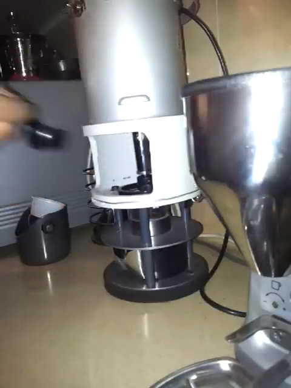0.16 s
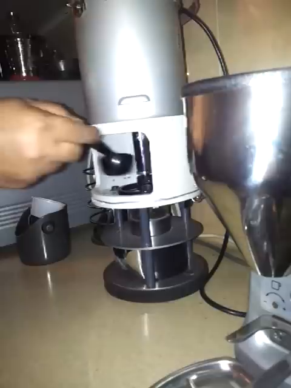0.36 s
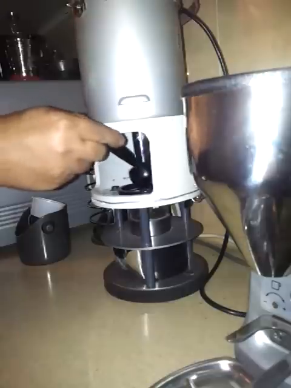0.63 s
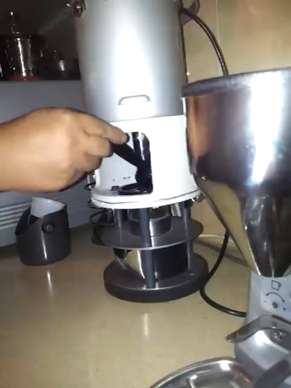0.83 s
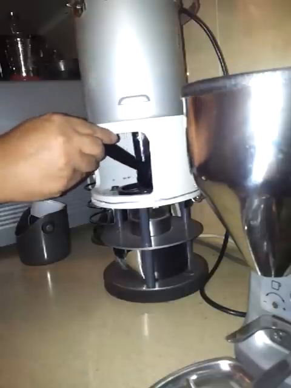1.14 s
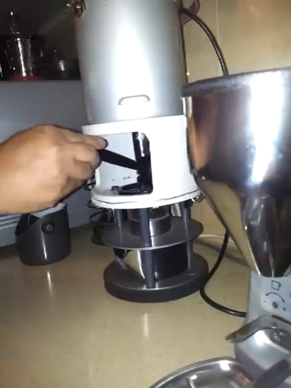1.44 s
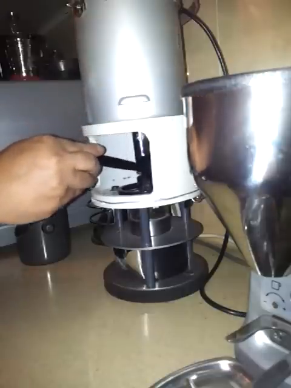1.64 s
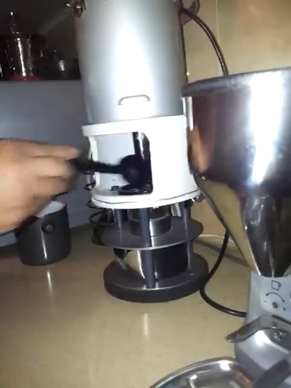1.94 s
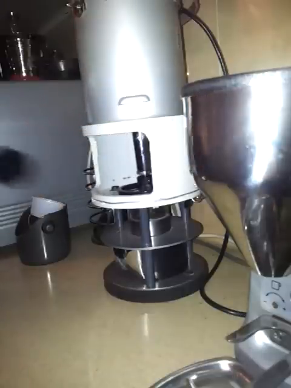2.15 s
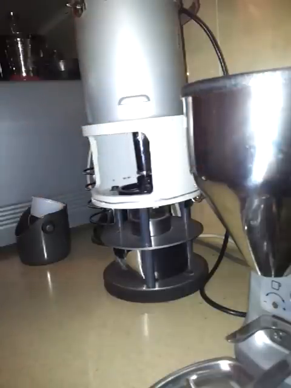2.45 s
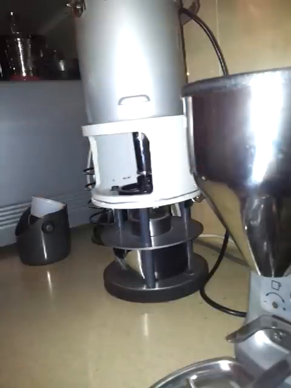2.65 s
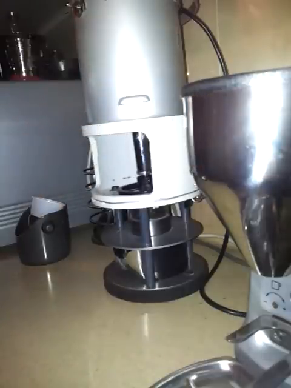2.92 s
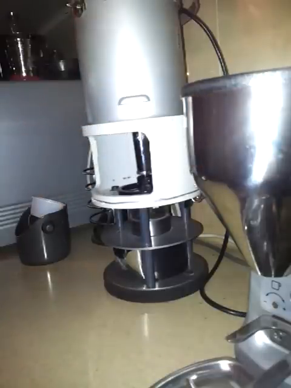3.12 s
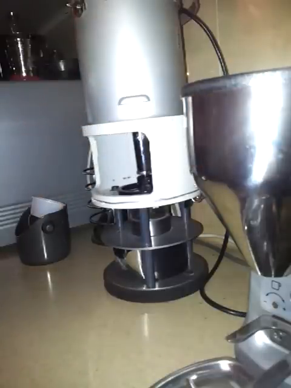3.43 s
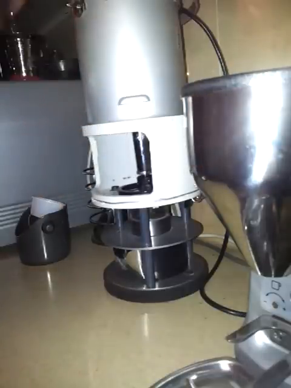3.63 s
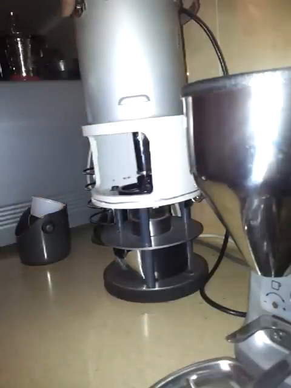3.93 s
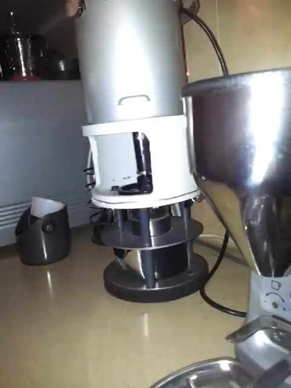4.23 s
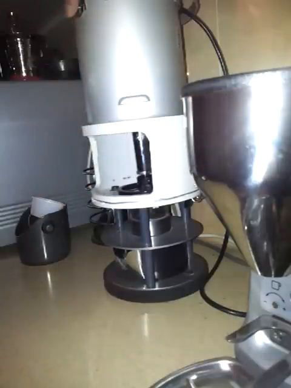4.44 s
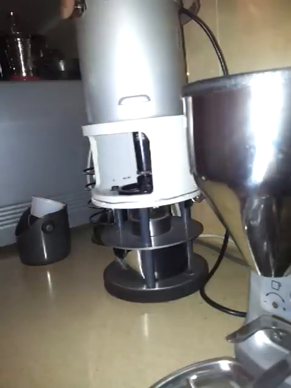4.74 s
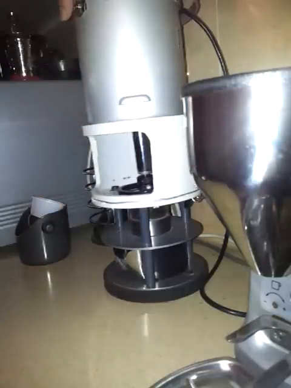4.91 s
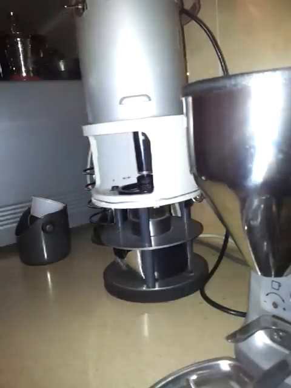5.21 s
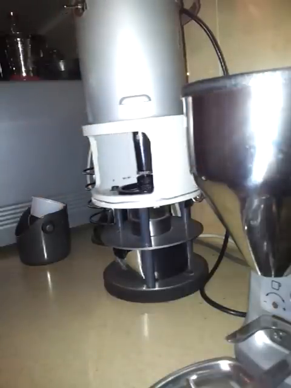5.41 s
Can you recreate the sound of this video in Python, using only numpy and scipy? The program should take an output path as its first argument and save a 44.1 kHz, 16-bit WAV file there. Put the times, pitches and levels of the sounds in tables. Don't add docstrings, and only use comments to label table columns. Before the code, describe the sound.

Beans tick down a metal chute, a cupboard knock and ringing steel lid follow, a switch snaps, then a coffee grinder starts crunching loudly.

```python
import sys
import numpy as np
from scipy import signal
from scipy.fft import rfft, irfft, next_fast_len
from scipy.io import wavfile
from scipy.ndimage import uniform_filter1d

SR = 44100
rng = np.random.default_rng(int(sys.argv[2]) if len(sys.argv) > 2 else 0)


def digitize_waveform(pressure):
    field = np.atleast_2d(pressure).T
    bounded = np.clip(field, -1, 1)
    quanta = np.round(bounded * 32767).astype(np.int16)
    wavfile.write(sys.argv[1], SR, quanta)


def linear_from_db(decibels):
    return 10 ** (np.asarray(decibels, float) / 20)


N = 245637
TIME = np.arange(N) / SR
SIZE = next_fast_len(N + SR)
HZ = np.maximum(np.arange(SIZE // 2 + 1) * SR / SIZE, 1)

# t/s, level/dB
MOVEMENT = [(0, -44), (.45, -47), (.74, -55), (1.93, -49), (2.12, -39), (2.4, -42.5), (2.9, -40.5),
            (3.3, -50), (3.66, -41.5), (4.0, -45), (4.74, -55.5)]
# f/Hz, level/dB per Hz
RUMBLE_SPECTRUM = [(15, -27), (25, 3), (63, 0), (89, -10), (102, 0.5), (123, 3.5), (169, -3), (407, -2),
                   (441, 0.5), (606, 0.5), (1270, -8), (5070, -14.5), (6110, -15.5), (11600, -14.5),
                   (14300, -19.5)]
# f/Hz, width/Hz, level/dB
RUMBLE_PEAKS = [(594, 120, -16), (2505, 79, 1), (5030, 380, -4.5), (5680, 33, 2.5), (11200, 170, -10)]
# f/Hz, level/dB per Hz
CLOTH_SPECTRUM = [(800, -18), (2000, -8.5), (3500, -4.5), (5000, -1), (6500, -7), (8000, -11.5),
                  (11000, -5), (14300, -15.5)]
# f/Hz, rms level/dB
MAINS_HUM = [(59.5, -66), (119.5, -69)]

# t/s, peak level/dB
STRAY_HITS = [
    (0.7952, -28.5),
]
# f/Hz, level/dB per Hz
STRAY_SPECTRUM = [(500, -13), (1200, -17), (2500, 8.5), (3200, 0), (4700, 0), (6200, -9), (7500, -15),
                  (14000, -17)]
# t/s, peak level/dB
EDGE_GRAZES = [
    (.9386, -35),
    (.989, -34),
    (1.959, -32.5),
    (2.2995, -32.5),
    (2.312, -53),
]
# f/Hz, level/dB per Hz
EDGE_SPECTRUM = [(2000, -36), (4000, -19), (4800, 15), (5800, -5), (9000, -6), (14500, -20)]
# t/s, peak level/dB
SCOOP_TAPS = [
    (1.4435, -24.5),
    (1.4495, -48),
    (1.4894, -44.5),
]
# f/Hz, level/dB per Hz
SCOOP_SPECTRUM = [(240, -55), (400, -45), (1330, -21.5), (1870, -34), (2430, -5.5), (3050, -7.5),
                  (3450, -48), (4790, -29), (7060, -52), (8000, -36), (10400, -57), (17600, -120)]
# f/Hz, level/dB, t60/s
SCOOP_MODES = [(2425, 6.5, 0.044), (2660, -22, 0.055), (3060, -14, 0.23)]

# t/s, level/dB
POUR_LEVEL = [(0.92, -64), (1.04, -37.5), (1.178, -34), (1.278, -41), (1.508, -30), (1.608, -16),
              (1.788, -60), (1.95, -97)]
# t/s, wall level/dB, ringing lip level/dB, bright skid level/dB
BEAN_HITS = [(1.0014, -38.5, -51, -40.5), (1.019, -44, -53, -47), (1.032, -37, -56, -55),
             (1.0562, -42, -56, -49), (1.0744, -43, -53, -46), (1.087, -32, -35, -37),
             (1.1046, -41, -56, -53), (1.124, -33, -53, -47), (1.133, -33, -47, -34),
             (1.153, -34, -46, -47), (1.169, -25, -21.5, -25.5), (1.18, -26.5, -40, -32),
             (1.1875, -28, -41, -33), (1.2105, -35, -37, -33), (1.2268, -41, -47, -32),
             (1.2364, -26.5, -38, -32.5), (1.247, -37, -41, -34), (1.2572, -41, -48, -39),
             (1.2761, -35, -30, -35), (1.305, -31.5, -29, -30), (1.3297, -45, -54, -49),
             (1.3486, -39, -47, -40), (1.3748, -34, -32.5, -33.5), (1.4057, -35.5, -48, -42),
             (1.4421, -46, -55, -49), (1.4493, -37, -50, -43), (1.4578, -42, -55, -48),
             (1.4887, -44, -35, -51), (1.5074, -34, -36, -31), (1.527, -24.5, -26, -30.5),
             (1.5412, -36, -42, -34), (1.552, -36, -31, -33), (1.558, -31, -25, -26.5),
             (1.5724, -29, -37, -31), (1.584, -35, -20.5, -25.5), (1.5974, -28, -34, -24),
             (1.6152, -42, -30, -36), (1.6225, -39, -32, -35), (1.656, -35, -53, -34),
             (1.669, -35, -41, -36), (1.6803, -39, -46, -40), (1.6882, -45, -43, -43),
             (1.713, -34, -28.5, -35), (1.7354, -52, -56, -43), (1.7485, -40, -52, -46),
             (1.7723, -56, -56, -47)]
# f/Hz, level/dB per Hz
BEAN_SPECTRUM = [(1470, -37), (2500, -31), (3020, -15), (3320, -31), (4100, -3), (5040, 5), (6600, -17),
                 (7420, -13), (10900, -3), (14300, -13)]
# f/Hz, width/Hz, level/dB
CHUTE_PEAKS = [(5150, 37, -8), (5540, 200, -8), (6570, 93, 6), (6640, 140, -15), (8500, 230, -2),
               (10000, 170, -6), (10100, 180, -5), (11170, 150, 2.5)]
# f/Hz, level/dB per Hz
WALL_SPECTRUM = [(1500, -48), (2500, -17), (3300, -14), (4200, -9.5), (5000, 2), (5700, -4.5), (7000, -16),
                 (14300, -27)]
# f/Hz, width/Hz, level/dB
LIP_PEAKS = [(6420, 86, 2.5), (6670, 99, 2)]
# f/Hz, level/dB per Hz
SKID_SPECTRUM = [(3000, -45), (7400, -14), (8500, -6), (9300, -5), (11100, 2), (12500, -9.5), (14300, -8.5)]

# t/s, peak level/dB
KNOCK_HITS = [(2.873, -3), (2.884, -8.5), (2.92, -21), (2.96, -19), (2.998, -28), (3.022, -18.5),
              (3.045, -28), (3.058, -31), (3.082, -34), (3.118, -39), (3.14, -34)]
# f/Hz, level/dB per Hz
BOARD_SPECTRUM = [(35, -40), (60, -23), (250, -9.5), (330, -24), (500, -3.5), (720, -1.5), (1100, -9.5),
                  (1900, -20.5), (2500, -33), (5750, -54), (7500, -52), (14000, -44)]
# f/Hz, level/dB, t60/s
WOOD_MODES = [(98.6, -19, 0.42), (149.4, -17.5, .3), (244, -22, .15), (345, -15, 0.9), (444, -13, 0.75),
              (553, -23, 0.55), (627, -22, 0.34), (730, -18, 0.33), (800, -19, .2), (856, -13, 0.33),
              (1007, -28, .5), (1098, -26, .4), (1561, -36, .5)]
# t/s, peak level/dB
CUTLERY_SHAKES = [
    (2.876, -32.5),
    (2.94, -40),
    (3.03, -38.5),
]
# f/Hz, width/Hz, level/dB
CUTLERY_PEAKS = [(4270, 190, 3), (5820, 200, 3), (2500, 130, -7), (11300, 380, -6.5)]

# t/s, crack level/dB, high, middle and low mode levels/dB
LID_HITS = [(3.1592, -34.5, -45, -30, -28), (3.171, -10, -13, -8, -17), (3.203, -17.5, -31, -31, -16),
            (3.2723, -20, -27, -15, -30), (3.2771, -14.5, -12.5, -10, -19), (3.308, -23, -35, -31, -25),
            (3.336, -25, -26, -30, -37), (3.3397, -18.5, -16.5, -14.5, -18.5), (3.376, -21, -35, -34, -38),
            (3.408, -24, -25, -35, -42), (3.428, -29.5, -41, -40, -20), (3.451, -26, -25, -38, -40)]
# f/Hz, level/dB per Hz
LID_SPECTRUM = [(150, -6.5), (600, -3), (1300, -11.5), (2200, -18.5), (3300, -5.5), (4000, -12.5),
                (5400, -0.5), (7200, -29), (9000, -16), (11500, -24), (14500, -10.5)]
# f/Hz, width/Hz, level/dB
RIM_PEAKS = [(10200, 270, -13), (10700, 130, -4), (11600, 1070, -7.5), (6460, 110, -21)]
# f/Hz, level/dB, t60/s
LID_HIGH = [(5109, -4.5, .45), (5085, -17, .3), (5195, -20, .3), (5530, -13, .3), (5468, -15, .45),
            (5555, -17, .6), (4253, -21, .2), (4522, -19, .3), (6013, -23, .13), (6455, -24, .15),
            (9808, -20, .2), (10750, -13, .25), (11190, -16, .3), (11780, -20, .3)]
# f/Hz, level/dB, t60/s
LID_MIDDLE = [(3128, -12, .09), (3172, -7, .25), (3205, -17, .15), (3010, -16, .45), (3332, -24, .15),
              (3600, -22, .15), (3871, -24, .2), (2570, -19, .15)]
# f/Hz, level/dB, t60/s
LID_LOW = [(390, -15, .2), (1578, -4, .45), (1562, -8, .5), (1600, -13, .2), (1490, -20, .25),
           (1760, -22, .3)]
# t/s, peak level/dB, f/Hz, t60/s
LONE_PARTIALS = [(3.155, -36, 1700, .06), (3.1598, -31, 3170, .08), (3.1686, -35, 2649, 0.32),
                 (3.1698, -21, 4510, .05), (3.2, -40, 4450, .2), (3.339, -21, 3350, 0.058),
                 (3.362, -30, 2655, 0.15), (3.433, -34.5, 2643, .2), (3.49, -42, 6020, .1),
                 (3.591, -35, 5950, 0.036), (3.6, -47, 2990, .4)]
# t/s, peak level/dB
COUNTER_HITS = [
    (3.216, -16.5),
    (3.277, -42),
]
# f/Hz, level/dB, t60/s
COUNTER_MODES = [(103, -9, 0.13), (121.4, -5.5, 0.18)]
# t/s, peak level/dB, tilt/dB per octave
PART_TOUCHES = [
    (3.5887, -32.5, 5.5),
    (3.6194, -35.5, 3),
    (3.862, -32.5, -3.5),
    (4.368, -35.5, -3.5),
    (4.3836, -37, 0),
    (4.589, -37, -1),
]
# f/Hz, level/dB, t60/s
PART_MODES = [(2600, -11, .12), (2985, -8, .25), (3975, -4, .13), (4050, -12, .08), (5520, -10, .3),
              (5585, -8, .4), (5657, -12, .15), (6000, -9, .05), (11500, -10, .06), (900, -16, .06)]
# t/s, peak level/dB
SWITCH_SNAPS = [
    (4.074, -5.5),
]
# f/Hz, level/dB per Hz
SWITCH_SPECTRUM = [(35, -48), (60, -10), (400, -9), (550, -16), (750, -15), (1800, -14.5), (5400, -6.5),
                   (12000, -9), (15000, -6.5)]
# f/Hz, width/Hz, level/dB
SWITCH_PEAKS = [(553, 27, -5.5), (984, 68, -9.5), (4210, 100, -8), (5400, 100, -4), (6960, 170, -10),
                (11100, 660, -6)]

# t/s, peak level/dB
MOTOR_KICKS = [
    (4.7485, -2.5),
    (4.752, 1.5),
]
# f/Hz, level/dB per Hz
CONTACTOR_SPECTRUM = [(35, -63), (60, -26), (551, -19), (960, -6), (1130, -14), (2590, -5.5), (2840, -10),
                      (3500, -1.5), (7500, -7), (11900, -3), (15000, -18)]
# t/s, level/dB
HARD_BEANS = [(4.8072, -9), (4.8619, -28), (4.8844, -12), (4.9019, -24), (4.9236, -9.5), (4.9739, -8),
              (5.0093, -21), (5.0442, -19), (5.076, -13.5), (5.098, -14), (5.1292, -32), (5.1449, -29),
              (5.1634, -22), (5.1782, -16), (5.1943, -12.5), (5.2139, -9), (5.2839, -34), (5.3229, -34),
              (5.3394, -16), (5.3539, -22), (5.3946, -16), (5.4377, -22), (5.4882, -29), (5.5082, -35),
              (5.5202, -28), (5.5354, -19), (5.564, -14)]
# f/Hz, level/dB per Hz
BURR_SPECTRUM = [(24, -57), (45, -20), (266, -11), (385, -29), (543, 1), (766, -8.5), (1130, -8),
                 (1280, -7), (1950, -11.5), (3790, -10.5), (5220, -8.5), (6670, -9), (7730, -15),
                 (11700, -11.5), (14300, -23)]
# f/Hz, width/Hz, level/dB
FRAME_PEAKS = [(1265, 37, -1), (1343, 40, -1), (2240, 52, -4), (3660, 45, -2.5), (3790, 120, -1.5),
               (4330, 720, -4.5), (4800, 60, -4), (5450, 19, -9), (5690, 40, -2), (5970, 37, -3),
               (6660, 150, 0.5), (9460, 36, -6), (10600, 50, -4), (11800, 200, -8)]
# f/Hz, width/Hz, level/dB
HOUSING_PEAKS = [(529, 47, -2), (470, 21, -11.5), (596, 20, -9), (671, 30, -5.5)]
# t/s, f/Hz
BOOM_PITCH = [(4.78, 538), (4.83, 534), (4.87, 543), (4.97, 548), (5.1, 541), (5.15, 544), (5.18, 537),
              (5.21, 547), (5.25, 537), (5.32, 543), (5.42, 541), (5.48, 539), (5.57, 550)]
# t/s, level/dB
LOAD_JOLTS = [(4.7846, -23), (4.7991, -22), (4.8292, -16.5), (4.8577, -14.5), (4.9048, -26), (4.9293, -36),
              (4.9521, -25), (4.9709, -20), (5.0057, -24), (5.0258, -24), (5.0746, -17), (5.0908, -9),
              (5.1317, -24), (5.1629, -19), (5.1776, -13.5), (5.2084, -13.5), (5.226, -32), (5.2426, -27),
              (5.2746, -14.5), (5.292, -26), (5.3376, -27), (5.3559, -21), (5.3736, -16), (5.4075, -19),
              (5.4437, -37), (5.4599, -18), (5.4793, -32), (5.5034, -29), (5.5221, -15.5), (5.5376, -36),
              (5.554, -17)]

# f/Hz, t60/s
KITCHEN_T60 = [(100, 0.64), (1000, 0.72), (5000, 0.71), (14000, 0.41)]
# f/Hz, level/dB
PORT_LEVEL = [(60, 9), (110, 6), (200, 8), (380, 5.5), (700, 5), (1280, -2.5), (2370, -1.5), (4370, -13),
              (8060, 2), (14900, 19.5)]
# f/Hz, likeness/0-1
PORT_COHERENCE = [(30, 0.3), (60, 0.98), (300, .97), (700, 0.88), (1100, 0.1), (2500, 0.02), (12000, 0.03)]
# f/Hz, phase/rad
PORT_PHASE = [(30, 2.4), (300, 2.44), (700, 1.7), (1100, 0.35), (2000, 0.13)]
# f/Hz, margin/dB
BAND_MARGIN = [(600, 60), (800, 28), (2000, 29), (2400, 48), (6600, 50), (6800, 31), (7400, 31), (7900, 60)]

PATHS = np.array([[0], [.25]])
RING_FLUTTER_DB = 2.3
BITE_S = 4.779


def in_time(rows):
    s, *columns = np.transpose(rows)
    return [np.interp(TIME, s, c, left=-120) for c in columns]


def at_hz(points, hz=HZ):
    f, value = np.array(points).T[:2]
    return np.interp(np.log(hz), np.log(f), value)


def highpass(x, order, hz):
    return signal.sosfilt(signal.butter(order, hz, "high", fs=SR, output="sos"), x)


def drift(rate_hz):
    lowpass = signal.butter(2, rate_hz, fs=SR, output="sos")
    slow = signal.sosfilt(lowpass, rng.standard_normal(N + SR))[SR:]
    return slow / slow.std()


def colour(x, spectrum, peaks=(), peak_db=0., base=0.59):
    size = 16384
    grid = np.maximum(np.arange(size // 2 + 1) * SR / size, 1)
    gain = linear_from_db(at_hz(spectrum, grid)) * base
    for hz, width, level_db in peaks:
        resonance = linear_from_db(level_db + peak_db) / np.hypot(1, 2 * (grid - hz) / width)
        gain = np.hypot(gain, resonance)
    fold = irfft(np.log(gain / np.sqrt(np.mean(gain ** 2)) + 1e-9))
    fold[1:size // 2] *= 2
    fold[size // 2 + 1:] = 0
    response = irfft(np.exp(rfft(fold)))
    sounding = np.flatnonzero(np.abs(x[0]) > 1e-5)
    start = sounding[0]
    part = signal.oaconvolve(x[:, start:sounding[-1] + 1], response[None], axes=1)[:, :N - start]
    out = np.zeros((2, N))
    out[:, start:start + part.shape[1]] = part
    return out


def envelope(events, rise_s, t60):
    power, age = np.zeros(N + SR), TIME[:SR // 4]
    shape = (linear_from_db(-60 * age / t60) * (1 - np.exp(-age / rise_s))) ** 2
    for s, level_db, *_ in events:
        power[round(s * SR):][:len(age)] += linear_from_db(level_db) ** 2 * shape
    return np.sqrt(power[:N])


def bursts(events, rise_s, t60):
    return envelope(events, rise_s, t60) * rng.standard_normal((2, N))


def ring(events, modes, level_db, flutter_db=6.0):
    out, rows = np.zeros((2, N)), np.array(events)
    rocking = linear_from_db(flutter_db * drift(52.0))
    at = np.round(rows[:, 0] * SR).astype(int)
    tilt = rows[:, 2] if rows.shape[1] > 2 else 0
    span = slice(at.min(), min(N, at.max() + SR))
    for k, (hz, mode_db, t60) in enumerate(modes):
        hit_db = rows[:, 1] + mode_db + level_db + tilt * np.log2(hz / 4000)
        energy = np.full(N, 1e-18)
        energy[at] = linear_from_db(hit_db + rng.standard_normal(len(at))) ** 2
        decaying = signal.lfilter([1], [1, -linear_from_db(-120 / (t60 * SR))], energy[span])
        size = np.sqrt(decaying) * np.roll(rocking, k * 9001)[span]
        turns = hz * TIME[:len(size)] - PATHS
        out[:, span] += size * np.sin(2 * np.pi * turns)
    return out


def grains(per_s, spread_db, t60):
    struck = rng.random(N) < per_s / SR
    cracks = struck * linear_from_db(spread_db * np.minimum(rng.exponential(1, N), 4))
    shape = np.sqrt(signal.lfilter([1], [1, -linear_from_db(-120 / (t60 * SR))], cracks ** 2 + 1e-18))
    return shape / np.sqrt(np.mean(shape ** 2)) * rng.standard_normal((2, N))


def room_tone():
    hiss_db, = in_time(MOVEMENT)
    rumble_db = -45.0 + 0.067 * (hiss_db + 44.5)
    rumble = linear_from_db(rumble_db + 0.13 * drift(0.17) - 6.5) * rng.standard_normal((2, N))
    hiss = linear_from_db(hiss_db - 10.0) * rng.standard_normal((2, N))
    hum = np.zeros(N)
    for hz, level_db in MAINS_HUM:
        wander_db = np.clip(2.0 * drift(8.2), -9, 4)
        hum += np.sqrt(2) * linear_from_db(level_db + wander_db) * np.sin(2 * np.pi * hz * TIME)
    far = colour(rumble, RUMBLE_SPECTRUM, RUMBLE_PEAKS, peak_db=-3.5 + 0.5, base=0.76)
    return far + colour(hiss, CLOTH_SPECTRUM) + hum


def plastic():
    stray = colour(bursts(STRAY_HITS, 0.00064, 0.054), STRAY_SPECTRUM) * linear_from_db(-4.0)
    graze = colour(bursts(EDGE_GRAZES, 0.0019, 0.026), EDGE_SPECTRUM)
    scoop = colour(bursts(SCOOP_TAPS, 0.00037, 0.058), SCOOP_SPECTRUM) * linear_from_db(5.0)
    return stray + graze + scoop + ring(SCOOP_TAPS, SCOOP_MODES, -6.0)


def beans():
    rows = np.array(BEAN_HITS)
    ticks = linear_from_db(in_time(POUR_LEVEL)[0] - 12.5) * grains(500., 2.6, 0.029)
    stream = colour(ticks, BEAN_SPECTRUM, CHUTE_PEAKS, peak_db=-4.0, base=0.98)
    wall_hits = bursts(rows[:, [0, 1]], 0.0013, 0.052)
    wall = colour(wall_hits, WALL_SPECTRUM, CHUTE_PEAKS[:2], peak_db=-3.0) * linear_from_db(2.5)
    lip_hits = bursts(rows[:, [0, 2]], 0.0017, 0.033)
    lip = colour(lip_hits, [(3000, -46), (14000, -42)], LIP_PEAKS) * linear_from_db(3.5)
    skids = bursts(rows[:, [0, 3]], 0.0016, 0.058)
    skid = colour(skids, SKID_SPECTRUM, CHUTE_PEAKS[4:], peak_db=-3.5) * linear_from_db(5.5)
    return stream + wall + lip + skid


def cupboard_knock():
    contact = colour(bursts(KNOCK_HITS, 0.0009, 0.069), BOARD_SPECTRUM) * linear_from_db(-1.5)
    return contact + ring(KNOCK_HITS, WOOD_MODES, -17.0)


def cutlery():
    return colour(bursts(CUTLERY_SHAKES, 0.0013, 0.18), [(1000, -40), (15000, -40)], CUTLERY_PEAKS)


def lone_partials():
    out, age = np.zeros((2, N)), TIME[:SR // 4]
    for s, level_db, hz, t60 in LONE_PARTIALS:
        partial = linear_from_db(level_db - 60 * age / t60) * np.sin(2 * np.pi * (hz * age - PATHS))
        out[:, round(s * SR):][:, :len(age)] += partial
    return out


def lid_crack():
    sharp = bursts(LID_HITS, 0.00039, 0.4) * linear_from_db(-2.0)
    soft = bursts(LID_HITS, 0.0012, 0.066) * linear_from_db(1.5)
    return colour(sharp + soft, LID_SPECTRUM, RIM_PEAKS) * linear_from_db(-8.5)


def lid_ring():
    hits = np.array(LID_HITS)
    high = ring(hits[:, [0, 2]], LID_HIGH, -8.0, RING_FLUTTER_DB)
    middle = ring(hits[:, [0, 3]], LID_MIDDLE, -7.0, RING_FLUTTER_DB)
    low = ring(hits[:, [0, 4]], LID_LOW, -6.5, RING_FLUTTER_DB)
    return high + middle + low + lone_partials()


def counter_thud():
    thud = ring(COUNTER_HITS, COUNTER_MODES, 0.1, flutter_db=6.5)
    return highpass(uniform_filter1d(thud, size=150, axis=1), 4, 85)


def part_contact():
    return colour(bursts(PART_TOUCHES, 0.0026, 0.076), SWITCH_SPECTRUM) * linear_from_db(-6.5)


def part_ring():
    return ring(PART_TOUCHES, PART_MODES, -6.0, RING_FLUTTER_DB)


def switch():
    return colour(bursts(SWITCH_SNAPS, 0.0012, 0.07), SWITCH_SPECTRUM, SWITCH_PEAKS) * linear_from_db(-1.0)


def motor_kick():
    return colour(bursts(MOTOR_KICKS, 0.0028, 0.049), CONTACTOR_SPECTRUM)


def patchy(x):
    start = round(BITE_S * SR)
    _, _, frames = signal.stft(x[:, start:], SR, nperseg=512)
    field = uniform_filter1d(rng.standard_normal(frames.shape[1:]), size=9, axis=0)
    field = uniform_filter1d(field, size=5, axis=1)
    swell = linear_from_db(1.5 * field / field.std() - 1)
    out = np.zeros((2, N))
    out[:, start:] = signal.istft(frames * swell, SR, nperseg=512)[1][:, :N - start]
    return out


def grinder():
    age, clumps = np.maximum(TIME - BITE_S, 0), drift(30.0)
    bite = 1 - np.exp(-(age / 0.0032) ** 2)
    load = bite * linear_from_db(-18.5 + 9.5 * np.exp(-age / 0.091))
    cracking = grains(1500., 3.1, 0.041) + 1.2 * rng.standard_normal((2, N))
    crush = load * linear_from_db(1.4 * clumps - 2.5) * cracking
    crush = crush + bursts(HARD_BEANS, 0.0031, 0.095) * linear_from_db(6.0)
    burrs = colour(patchy(crush), BURR_SPECTRUM, FRAME_PEAKS, peak_db=-7.0, base=0.67) * linear_from_db(-4.5)
    shake = load * linear_from_db(2.0 * clumps) * rng.standard_normal((2, N))
    hollow = colour(shake, [(300, -26.5), (520, -33), (900, -40), (2000, -68)], HOUSING_PEAKS)
    turns = np.cumsum(in_time(BOOM_PITCH)[0]) / SR + .075 * drift(20) + PATHS
    jolts = envelope(LOAD_JOLTS, 0.0081, 0.11) * linear_from_db(9.5)
    boom_size = np.hypot(bite * linear_from_db(-29), jolts) * linear_from_db(0.97 * drift(22.0))
    return burrs + hollow * linear_from_db(-10.0), boom_size * np.sin(2 * np.pi * turns)


def kitchen(x):
    age, tail = np.arange(SR) / SR, np.zeros((2, SR))
    white = rng.standard_normal((2, 2, SR))
    for k, low in enumerate(40 * 2. ** np.arange(9)):
        octave = signal.butter(2, [low, min(2 * low, .45 * SR)], "band", fs=SR, output="sos")
        t60 = at_hz(KITCHEN_T60, 1.4 * low)
        tail += signal.sosfilt(octave, white[k % 2]) * linear_from_db(-60 * age / t60)
    tail *= np.clip(age / 0.011, 0, 1)
    tail /= np.sqrt(np.sum(tail ** 2, axis=1, keepdims=True))
    return irfft(rfft(x, SIZE) * rfft(tail, SIZE), SIZE)[:, :N]


def ports(paths):
    first, second = rfft(paths, SIZE)
    left, turn = linear_from_db(at_hz(PORT_LEVEL)), at_hz(PORT_PHASE)
    alike = np.clip(at_hz(PORT_COHERENCE), 0, 1)
    mean = .5 * np.sqrt(left ** 2 + 1 + 2 * left * alike * np.cos(turn))
    right = alike * np.exp(-1j * turn) * first + np.sqrt(1 - alike ** 2) * second
    return irfft(np.array([left * first, right]) / mean, SIZE)[:, :N]


def scene():
    clicks, poured = plastic(), beans()
    handled = cupboard_knock() + cutlery() + lid_crack() + counter_thud()
    handled = highpass(handled + part_contact() + switch() + motor_kick(), 3, 75)
    rings = lid_ring() + part_ring()
    motor, boom = grinder()
    direct = clicks + poured + handled + rings + motor + boom
    wet = linear_from_db(-14.0) * clicks + linear_from_db(-7.5) * poured + linear_from_db(-9.0) * handled
    wet = wet + linear_from_db(-14) * rings + linear_from_db(-6.5) * motor + linear_from_db(-17.5) * boom
    return ports(direct + kitchen(wet) + room_tone())


def fade_weak_bands(x):
    hz, _, frames = signal.stft(x, SR, nperseg=2048)
    power = np.sum(np.abs(frames) ** 2, axis=0)
    level_db = 10 * np.log10(uniform_filter1d(power, size=9, axis=0) + 1e-18)
    margin_db = level_db - level_db.max(axis=0) + at_hz(BAND_MARGIN, np.maximum(hz, 1))[:, None]
    gain = .55 + .45 * np.tanh(margin_db / 1.5)
    return signal.istft(frames * gain, SR, nperseg=2048)[1][:, :N]


def band_limit(x):
    return signal.sosfilt(signal.butter(12, 15470, fs=SR, output="sos"), x)


def record(dry):
    cut = highpass(dry, 2, 27)
    cut = 1.022 * np.tanh(cut / 1.147)
    cut = signal.sosfilt(signal.ellip(10, .5, 45, 14440, fs=SR, output="sos"), cut)
    mix = fade_weak_bands(cut)
    return band_limit(mix)


dry = scene()
out = record(dry)
digitize_waveform(out)
```